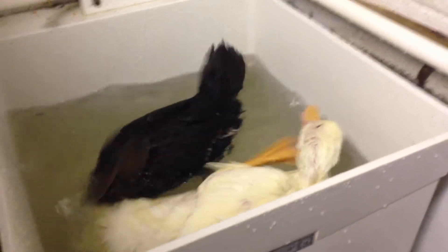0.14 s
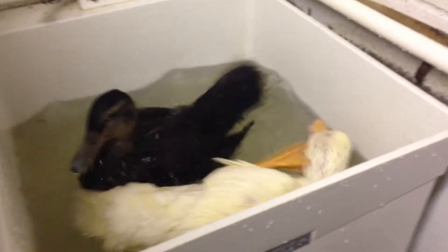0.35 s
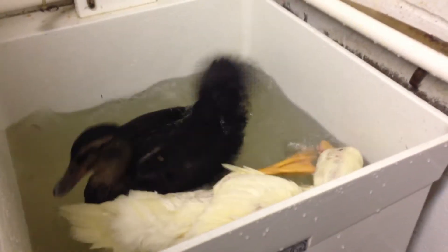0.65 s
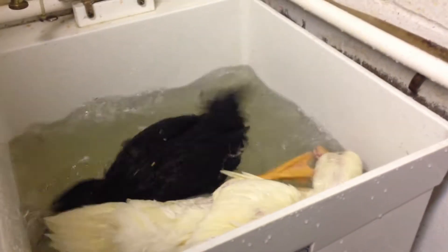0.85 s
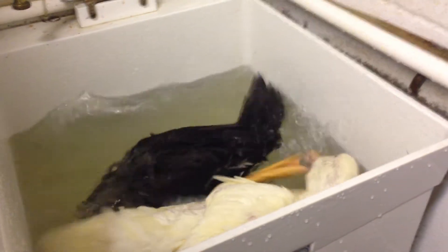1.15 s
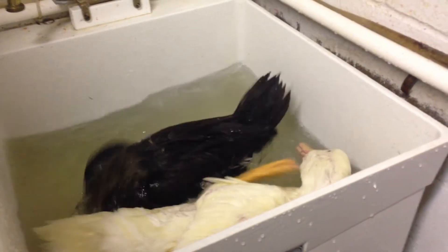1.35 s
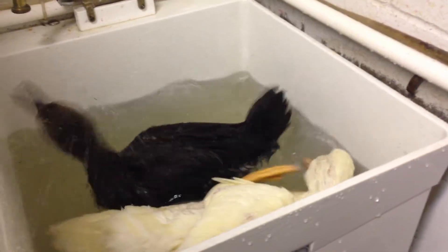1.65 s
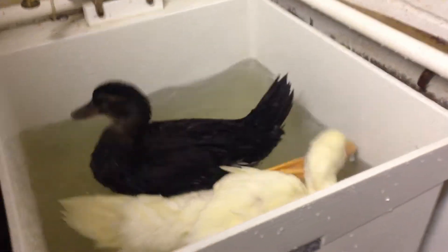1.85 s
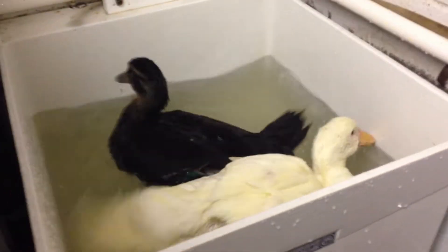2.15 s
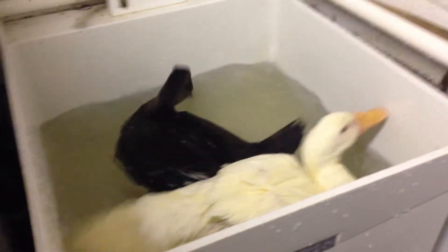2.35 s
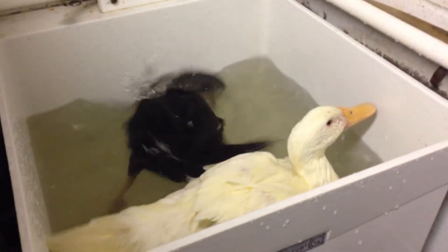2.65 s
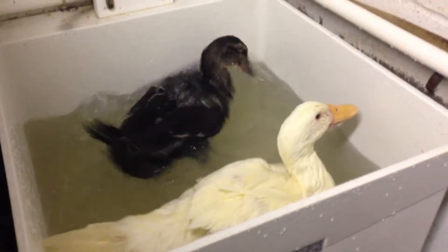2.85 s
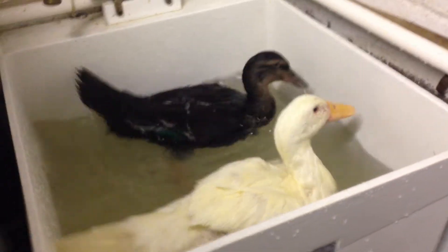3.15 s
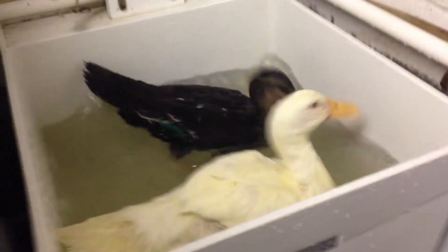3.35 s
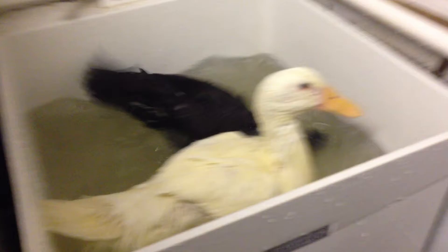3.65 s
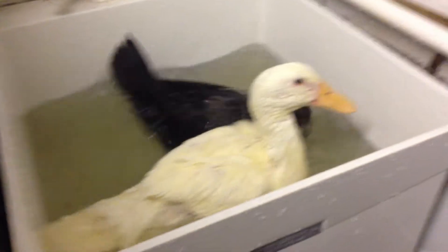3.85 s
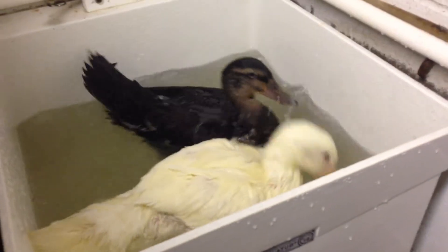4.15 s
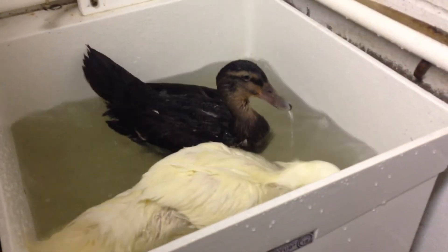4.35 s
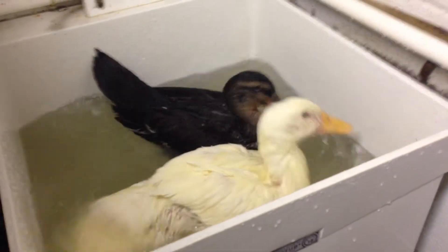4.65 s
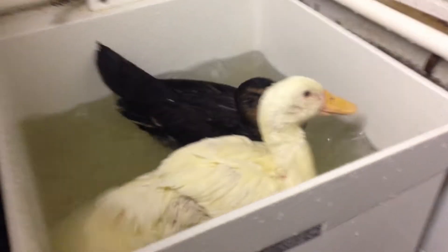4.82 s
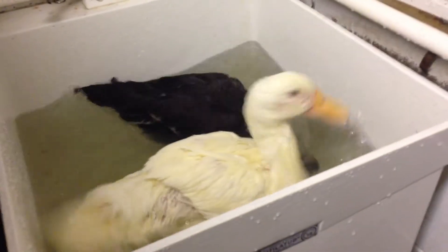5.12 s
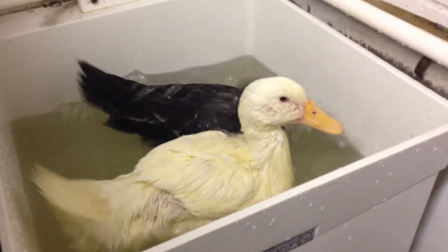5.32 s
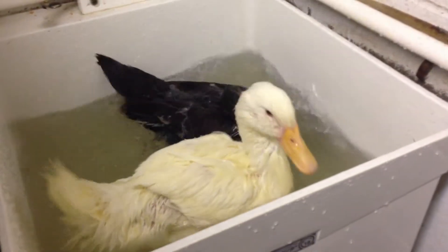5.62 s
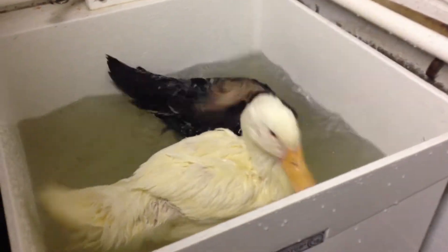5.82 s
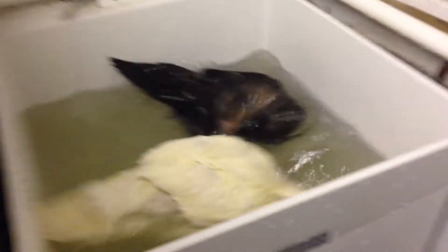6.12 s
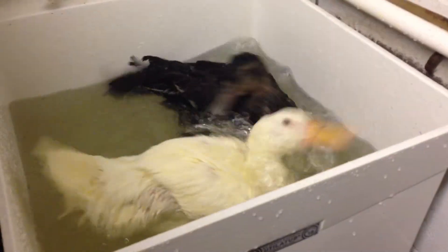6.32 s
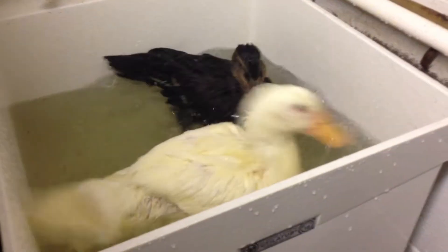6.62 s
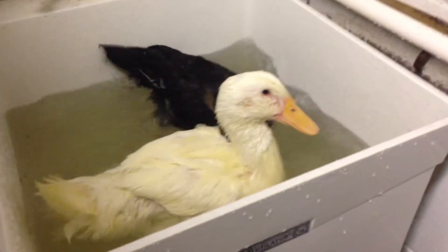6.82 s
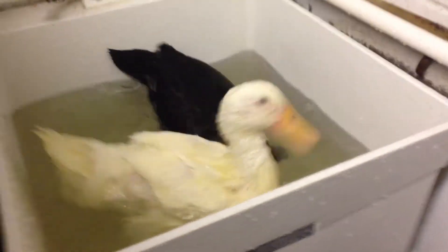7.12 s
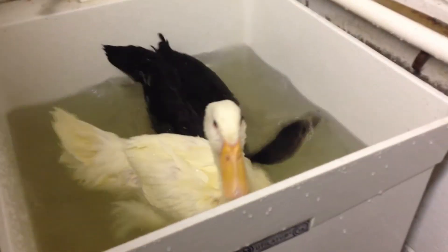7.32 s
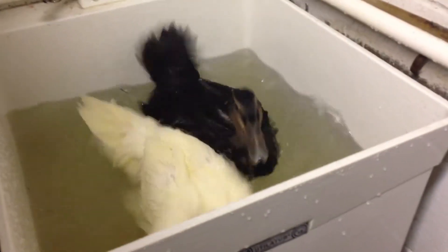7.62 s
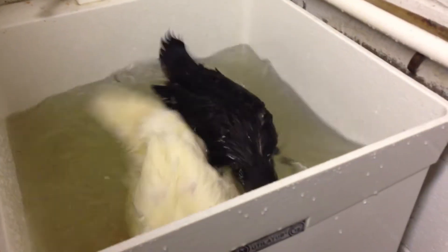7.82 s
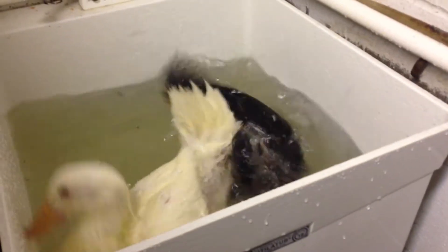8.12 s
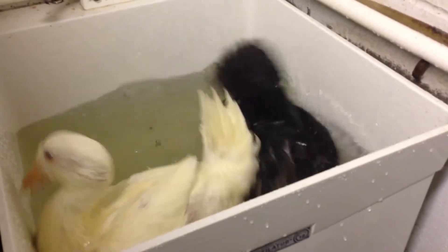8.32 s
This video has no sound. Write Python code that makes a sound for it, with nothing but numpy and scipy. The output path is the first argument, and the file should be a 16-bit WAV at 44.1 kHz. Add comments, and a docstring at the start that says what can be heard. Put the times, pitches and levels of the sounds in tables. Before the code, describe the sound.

Two young ducks bathe in a half-filled plastic utility sink in a small hard room, heard close. Busy splashing, bubbling and clear plinks fill the opening, with a hollow thump as water slaps the tub. It settles to lighter drips and gurgles with occasional knocks, nearly quiets with one tiny squeak, then bursts into strong churning at the end. Faint low room rumble underneath.

```python
"""In a small, hard room two young ducks bathe in a half-filled plastic utility sink.
Dipping heads and wagging tails churn the water: swarms of pulsing bubbles, foam and droplets of shaped noise.
Single bubbles plink, air pockets gulp and the tub booms low, as decaying sines; splashes hiss as brief noise.
Hard strokes slap the water with dying noise and make the tub ring in its modes.
A faint squeak wavers once; wall echoes, a room tail and a faint rumble surround it all."""
import sys
import numpy as np
from scipy import signal
from scipy.fft import rfft, irfft, next_fast_len
from scipy.io import wavfile
from scipy.ndimage import uniform_filter1d

SR = 44100
rng = np.random.default_rng(int(sys.argv[2]) if len(sys.argv) > 2 else 0)


def master(y):
    """Save y as 16-bit WAV."""
    cut = np.clip(np.atleast_2d(y).T, -1, 1)
    pcm = np.round(cut * 32767)  # scale
    wavfile.write(sys.argv[1], SR, pcm.astype(np.int16))


N = 373527


def amp(db):
    """Logarithmic level: decibels to amplitude gain."""
    return 10 ** (np.asarray(db) / 20)


def unit(x):
    """Power normalization: scale to rms 1."""
    return x / np.sqrt(np.mean(x ** 2) + 1e-20)


def along(points, hz):
    """Logarithmic frequency scale: interpolate (frequency [Hz], value) points along it."""
    f, v = np.transpose(points)
    return np.interp(np.log(hz + 1), np.log(f + 1), v)


def filtered(x, gain):
    """Linear filtering: multiply the spectrum of x by a gain that depends on frequency."""
    size = next_fast_len(len(x) + 2048)
    spectrum = rfft(x, size) * gain(np.fft.rfftfreq(size, 1 / SR))
    return irfft(spectrum, size)[:len(x)]


def add(track, s, sound):
    """Superposition: mix a sound into the track at time s [s]."""
    part = track[max(0, round(s * SR)):][:len(sound)]
    part += sound[:len(part)]


def dying_noise(decay):
    """Frequency-dependent damping: half a second of noise, each frequency with its own t60."""
    hz, t, z = signal.stft(rng.standard_normal(SR // 2), SR, nperseg=128)
    loss_db = 60 * t / along(decay, hz)[:, None]
    return signal.istft(z * amp(-loss_db), SR, nperseg=128)[1][:SR // 2]


def bubble(t, hz, t60, glide):
    """Volume pulsation: a bubble swells within a cycle, then dies while its pitch slides (octaves per s)."""
    pitch = hz * 2 ** np.clip(glide * t, -1, 1)
    tone = np.sin(2 * np.pi * np.cumsum(pitch, axis=-1) / SR)
    decay = np.exp(-np.log(1000) * t / t60)
    swell = 1 - np.exp(-2 * hz * t)
    return tone * decay * swell


def swarm(per_s, low_hz, high_hz, cycles, spread_db, rise):
    """Random superposition: a steady stream of bubbles, many weak and few strong, of rms 1."""
    when, kind, strength = rng.random((int(per_s * N / SR), 3)).T
    size, life = rng.random((300, 2)).T[:, :, None]
    hz = low_hz * (high_hz / low_hz) ** size
    t60 = cycles / hz * (.5 + life)
    k = np.arange(int(SR * cycles / low_hz))
    shapes = bubble(k / SR, hz, t60, rise / t60)  # rise: octaves per t60
    chosen = shapes[(kind * len(shapes)).astype(int)]
    grains = amp(spread_db * strength ** 3)[:, None] * chosen
    places = (when * N).astype(int)[:, None] + k
    return unit(np.bincount(places.ravel(), grains.ravel(), minlength=N)[:N])


def wavering(depth_db, size):
    """Random amplitude modulation: a gain of rms depth_db, smoothed over size samples."""
    drift = signal.fftconvolve(rng.standard_normal(N), np.hanning(size), "same")
    return amp(depth_db * unit(drift))


def bout(s, length):
    """Growth and damping of stirred water: it swells up to time s, holds, then settles."""
    rise_s, settle_db_per_s = 0.049, 201
    t = np.arange(N) / SR - s
    swell = np.clip(1 + t / rise_s, 0, 1) ** 2
    return swell * amp(-settle_db_per_s * np.maximum(t - length, 0))


def agitation():
    """Addition of powers: every bout stirs gurgle, bubbling and spray in water never quite calm."""
    # bouts of dipping, paddling and tail wagging: (time [s], length [s], bubbling drive [dB],
    # gurgle over bubbling drive [dB], spray over bubbling drive [dB])
    stirs = [(0.0, 0.045, -55.5, 0, -9), (0.097, 0.2, -54.5, -16, -6.5), (0.528, 0.0081, -50, -27, -0.5),
             (0.627, 0.015, -46.5, -19, -7), (0.728, 0.04, -43.5, -24, -9.5), (0.86, 0.3, -48.5, -14, -9),
             (1.17, 0.059, -43.5, -7, -13), (1.264, 0.16, -59.5, -6, 7.5), (1.59, 0.15, -57, -0.5, -1),
             (1.706, 0.12, -53, -2, -8.5), (1.89, 0.65, -60.5, -9, -6.5), (2.43, 0.16, -71.5, -17, 3),
             (2.608, 0.3, -56, -1, -6), (2.929, 0.037, -50, 1, -9), (2.98, 0.35, -59, -8, -9),
             (3.5, 0.56, -60.5, -6.5, -7), (4.227, 0.011, -55.5, 4.5, -10), (4.597, 0.11, -60.5, -6, -5),
             (4.735, .38, -63.5, -6.5, -3), (5.147, 0.17, -53, -13, -10), (5.335, 0.081, -48, -3, -27),
             (5.467, 0.1, -50.5, -9, -6.5), (5.6, 0.16, -62, -5, -2), (6.101, 0.025, -61, 3, -1.5),
             (6.285, 0.066, -54.5, -10, -7.5), (6.433, 0.054, -56, -26, 3.5),
             (6.572, 0.13, -56.5, -21, -4.5), (7.457, .02, -47.5, -7, -0.5), (7.674, 0.07, -60, -4, 1.5),
             (7.839, 0.028, -56, 1, -9), (7.947, 0.059, -42.5, -3, -14.5), (8.081, 0.088, -40, -6.5, -11.5),
             (8.208, 0.047, -43.5, -9, -5), (8.303, 0.082, -53.5, -0.5, -5)]
    calm_db = -76.5  # drive between bouts
    power = np.full((3, N), amp(calm_db) ** 2)
    for s, length, db, gurgle_db, spray_db in stirs:
        drive = amp([[db + gurgle_db], [db], [db + spray_db]])
        power += drive ** 2 * bout(s, length) ** 2
    return np.sqrt(power)


def churn():
    """Bubble size sets pitch: large ones gurgle, small ones tinkle, a few chirp; foam washes, droplets patter."""
    # spectrum of the foam wash: (frequency [Hz], relative density [dB per Hz])
    foam_colour = [(400, -29), (1300, -13), (2400, -5), (4500, -10.5), (9000, -22)]
    # weighting of the falling droplets: (frequency [Hz], relative level [dB])
    patter_colour = [(100, -60), (500, -25), (1500, -10.5), (3000, -0.5), (5000, 1), (8000, 0.5),
                     (12000, -5), (16000, -20)]
    gurgle_db, bubbling_db, spray_db = 20 * np.log10(agitation())
    gurgle = swarm(per_s=300, low_hz=500, high_hz=1600, cycles=18, spread_db=12, rise=.4)
    bubbling = swarm(per_s=330, low_hz=1300, high_hz=4600, cycles=36, spread_db=19, rise=.3)
    fizz = swarm(per_s=380, low_hz=4200, high_hz=11000, cycles=40, spread_db=18, rise=.1)
    chirps = swarm(per_s=70, low_hz=1100, high_hz=6000, cycles=55, spread_db=14, rise=.45)
    patter = swarm(per_s=1400, low_hz=1500, high_hz=16000, cycles=3, spread_db=13, rise=0)
    # the square root tilts the droplets up by 3 dB per octave
    patter = unit(filtered(patter, lambda hz: amp(along(patter_colour, hz)) * np.sqrt(hz)))
    foam = unit(filtered(rng.standard_normal(N), lambda hz: amp(along(foam_colour, hz))))
    foam_db = 1.287 * bubbling_db + 9.0  # only hard stirring whips up much foam
    clumps = wavering(depth_db=3.0, size=900)
    bubbles = amp(gurgle_db) * gurgle
    bubbles += amp(bubbling_db - 8.5) * bubbling * clumps
    bubbles += amp(spray_db - 1.0) * fizz
    bubbles += amp(bubbling_db - 5) * chirps
    return bubbles + amp(foam_db) * foam + amp(spray_db + 0.5) * patter * clumps


def plinks():
    """Bubble resonance: single bubbles ring briefly, the stronger ones shorter; the tub wall returns each ping."""
    # the clearest single bubbles: (time [s], relative level [dB], nominal pitch [Hz])
    single_bubbles = [(0.1127, -45.5, 1255), (0.197, -45, 3320), (0.241, -34.5, 2580), (0.2436, -39, 1420),
                      (0.3, -41.5, 1766), (0.5324, -39, 1360), (0.626, -36, 2430), (0.64, -25.5, 1970),
                      (0.6535, -38, 853), (0.696, -33.5, 3440), (0.739, -31.5, 1540), (0.754, -27, 1820),
                      (0.769, -31, 2850), (0.7878, -34, 5270), (0.8434, -17.5, 2821), (0.9414, -27.5, 1930),
                      (1.0132, -36.5, 913), (0.929, -36, 6000), (1.0267, -28, 4300), (1.0601, -23.5, 2400),
                      (1.1503, -34, 1770), (1.1625, -28.5, 3540), (1.189, -40, 1330), (1.224, -29.5, 1540),
                      (1.2501, -13, 3050), (1.263, -22.5, 2670), (1.4856, -16.5, 2430), (1.496, -21, 3200),
                      (1.5333, -25, 1900), (1.7156, -43, 676), (1.786, -35, 754), (1.791, -38.5, 1116),
                      (1.8, -34, 2100), (1.832, -37.5, 1300), (1.8346, -33, 2450), (1.891, -38, 4260),
                      (1.947, -36, 3200), (2.0205, -32.5, 2850), (2.1597, -34, 2770), (2.2453, -33.5, 1990),
                      (2.5784, -34, 2260), (2.618, -14.5, 4530), (2.6198, -30, 1150), (2.751, -27.5, 7537),
                      (2.8537, -37, 4091), (2.9169, -37, 2930), (2.9132, -41, 850), (2.9388, -33, 1260),
                      (2.944, -30, 1860), (2.9866, -39.5, 3500), (2.9932, -33.5, 1470), (3.118, -33, 2324),
                      (3.326, -38.5, 7000), (3.6567, -27.5, 4820), (3.7903, -37.5, 1900),
                      (3.8097, -39, 3270), (3.937, -41, 4600), (4.026, -42, 2940), (4.0373, -33, 7970),
                      (4.051, -46, 5900), (4.081, -36, 4840), (4.241, -33.5, 6900), (4.481, -46, 1860),
                      (4.6127, -51, 1760), (4.6346, -41, 2970), (4.6785, -41, 3670), (4.772, -47, 3090),
                      (5.158, -28.5, 1740), (5.2496, -40, 802), (5.336, -45, 1430), (5.377, -41, 1863),
                      (5.30, -50.5, 1000), (5.3988, -41, 694), (5.495, -34, 2100), (5.5078, -24.5, 2498),
                      (5.5622, -44, 745), (5.575, -39, 2930), (5.635, -32, 6800), (5.743, -42.5, 4100),
                      (5.8004, -32.5, 2330), (6.176, -35, 6320), (6.2942, -41.5, 2300), (6.3806, -36, 4060),
                      (6.4449, -28, 3520), (6.4483, -26.5, 2300), (6.4966, -42.5, 1440),
                      (6.5546, -41, 5450), (6.6081, -46, 2590), (6.83, -42, 3140), (7.3979, -33, 2320),
                      (7.456, -27.5, 2810), (7.54, -33, 2300), (7.708, -32, 7000), (7.942, -35, 1378),
                      (7.9614, -22.5, 2300), (8.19, -27, 5780), (8.243, -38, 1530), (8.2607, -35, 1760),
                      (8.314, -37, 1120), (8.3222, -31.5, 1005), (8.366, -41, 1220), (8.379, -40, 2560)]
    # a bubble of the reference level rings 58 cycles; stronger ones die sooner
    ring_cycles, reference_db, halving_db = 58, -31, 27
    out, t = np.zeros(N), np.arange(SR // 10) / SR
    for s, db, hz in single_bubbles:
        t60 = ring_cycles / hz * 2 ** ((reference_db - db) / halving_db)
        rise, detour = rng.random(2)
        # starts just under the nominal pitch and slides up
        ping = amp(db + 2.5) * bubble(t, hz * .96, t60, glide=(0.35 + 0.4 * rise) / t60)
        add(out, s, ping)
        add(out, s + 0.004 + 0.0042 * detour, amp(-9.5) * ping)
    return out


def splashes():
    """Breakup of a water sheet: a brief hiss of droplets and the tiny bubbles that they drive in."""
    # splashes: (time [s], relative level [dB], mist: spectral lift from 10 kHz up [dB])
    splash_events = [(0.047, -41.5, 14), (0.115, -39.5, 12), (0.206, -34.5, -7), (0.453, -41.5, -1),
                     (0.5324, -31, -11), (0.6403, -27, -5), (0.728, -31, 21), (0.7625, -30, -25),
                     (0.8415, -27, 8), (0.926, -28, 2), (0.956, -24, 6), (0.993, -40, 28),
                     (1.0262, -26, -30), (1.056, -31.5, 3), (1.1508, -28.5, 9), (1.2488, -22.5, -18),
                     (1.3734, -25, 4.5), (1.4871, -27.5, 1), (1.56, -27.5, -37), (1.62, -37, -23),
                     (1.815, -27, 0), (1.8897, -44, -23), (1.9518, -31.5, 5), (2.013, -41.5, 11),
                     (2.094, -40.5, -16), (2.1298, -32.5, -19), (2.158, -38, 13), (2.2462, -34, -29),
                     (2.3276, -42, 5), (2.6155, -20.5, -3.5), (2.743, -31, -8), (2.7493, -29, -2),
                     (2.787, -23, -6), (2.8146, -29.5, 10), (2.898, -35.5, 21), (2.9297, -28.5, -9),
                     (3.1798, -39.5, -2), (3.2548, -41.5, 9), (3.118, -40, -12), (3.324, -52, 31),
                     (3.459, -41.5, -5), (3.527, -35, -7), (3.6563, -35, 13), (3.7887, -42.5, -4),
                     (3.9005, -40.5, -21), (4.035, -35.5, 0), (4.0799, -33, 28), (4.2344, -41.5, -5),
                     (4.275, -47, 10), (4.342, -41, -3), (4.406, -44.5, 8), (4.641, -43.5, 27),
                     (5.1567, -28, 2.5), (5.254, -35.5, -9), (5.335, -38.5, 27), (5.422, -35, -2),
                     (5.635, -39.5, 0), (5.728, -41.5, 32), (6.2853, -45, 26), (6.3764, -37, -1),
                     (6.434, -27, -1), (6.447, -33, -5), (6.5555, -44, 10), (7.393, -44, -10),
                     (7.456, -44, -9), (7.597, -37.5, 5), (7.7114, -37.5, 9), (7.7983, -37, 2),
                     (7.957, -28, -17), (7.9854, -26.5, -5), (8.0995, -26, -24), (8.3115, -28.5, -14)]
    # spectrum of the spray before the mist lift: (frequency [Hz], relative density [dB per Hz])
    spray_colour = [(100, -60), (500, -22), (1500, -8), (3000, 0.5), (5000, 0.5), (8000, -1.5), (12000, -9),
                    (16000, -22)]
    swell_s, fade_s = 0.002138, 0.0061
    drizzle_db, drizzle_fade_s = -17, .022  # a weaker, slower second decay
    out, t = np.zeros(N), np.arange(SR // 8) / SR
    for s, db, mist_db in splash_events:
        flutter = unit(uniform_filter1d(rng.standard_normal(len(t)), size=30))
        droplets = rng.standard_normal(len(t)) * amp(2.5 * flutter)

        def colour(hz):
            return amp(along(spray_colour, hz) + along([(4500, 0), (10000, mist_db)], hz))

        swell = 1 - np.exp(-(t / swell_s) ** 2)
        fade = np.exp(-t / fade_s) + amp(drizzle_db) * np.exp(-t / drizzle_fade_s)
        hiss = unit(filtered(droplets, colour)) * fade * swell
        delay, size, strength = rng.random((9, 3)).T[:, :, None]  # nine bubbles
        hz = 1700 * 7 ** size
        age = np.maximum(t[:SR // 20] - .018 * delay ** 2, 0)
        level = amp(-8 * strength - 2.7 * delay) * colour(hz)
        rings = (bubble(age, hz, 35 / hz, glide=15) * level).sum(axis=0)
        rings *= np.linalg.norm(hiss) / np.linalg.norm(rings)  # hiss and bubbles share the energy equally
        rings = np.pad(rings, (0, len(t) - len(rings)))
        add(out, s - swell_s / 2, amp(db - 6.5) * (hiss + rings))
    return out


def gulps_and_booms():
    """Low resonance: air pockets gulp with gliding pitch, and the tub's lowest mode booms twice."""
    # air pockets, and two low booms of the tub near 140 Hz:
    # (time [s], relative level [dB], starting pitch [Hz], t60 [s], glide [octaves per s])
    low_tones = [(.866, -31, 1034, 0.063, -36), (2.191, -17, 398, 0.045, -28), (2.244, -30.5, 287, .09, -4),
                 (2.378, -28, 353, 0.069, -24), (2.7863, -5, 653, 0.021, -6),
                 (2.795, -11.5, 631, 0.05, 64.5), (3.545, -9.5, 640, 0.011, -24),
                 (3.562, -29, 144, 0.64, 0), (3.607, -24, 640, .022, 1), (4.42, -28, 400, .12, -2.5),
                 (4.478, -36, 593, .08, -2), (5.324, -39.5, 452, 0.17, -5), (6.139, -34, 666, 0.055, -19),
                 (6.151, -27, 422, 0.064, -3), (7.45, -29.5, 430, 0.13, 5), (8.076, -25, 642, 0.18, 1.5),
                 (8.099, -20.5, 373, 0.082, 0), (8.109, -32.5, 136, 0.26, -1.5),
                 (8.148, -31, 678, 0.12, -0.5), (8.195, -26.5, 450, 0.04, 0)]
    out, t = np.zeros(N), np.arange(SR // 2) / SR
    for s, db, hz, t60, glide in low_tones:
        # the same decaying sine serves pockets and booms
        add(out, s, amp(db) * bubble(t, hz, t60, glide))
    return out


def strokes():
    """Impact excitation of modes: a slab of water slaps the wall and the tub's modes swell and ring."""
    # strokes that shake the tub: (time [s], relative slap level [dB], relative ring level [dB],
    # bass lift [dB], treble lift [dB])
    blows = [(0.863, -14, -40.5, -2, -8), (2.19, -21.5, -41, 0.5, -5.5), (2.376, -28.5, -54.5, 11, -16),
             (2.786, -14.5, -39, -5.5, 0), (3.542, -15, -34, -4, -12), (3.605, -21, -44, 1, -15),
             (4.405, -11.5, -31.5, -1.5, -6), (6.134, -16.5, -36.5, 1, -11), (8.073, -11, -34.5, -8, -1.5),
             (8.099, -25, -42.5, 9, 10)]
    # modes of the tub and the air in it: (frequency [Hz], mean relative level [dB], t60 [s])
    tub_modes = [(146.1, 0.5, 0.51), (224, -33, 0.37), (308, 3.5, 0.24), (356, -2.5, 0.48),
                 (390.5, -7.5, 0.29), (455.5, 3.5, 0.29), (535, 2, 0.27), (668.6, 10.5, 0.13),
                 (733, -36, 0.094), (786, 7, 0.15), (913, 1, 0.086), (993, -2, 0.17), (1055, 2.5, 0.045),
                 (1198, 5.5, 0.11), (1550, -16, 0.33)]
    # weighting of the slap noise: (frequency [Hz], relative density [dB per Hz])
    slap_colour = [(30, -52), (80, -23), (150, 1), (300, -0.5), (640, 6), (800, -2), (1100, -0.5),
                   (2200, -0.5), (4500, -9.5), (10000, -36)]
    # damping of the slap: (frequency [Hz], t60 [s])
    slap_decay = [(120, 0.56), (400, 0.24), (800, 0.11), (2000, 0.081), (6000, 0.017)]
    out, t = np.zeros(N), np.arange(SR // 2) / SR
    for s, slap_db, ring_db, bass_db, treble_db in blows:
        def weight(hz):
            return amp(along([(150, bass_db), (300, 0), (480, 0), (1400, treble_db)], hz))

        ring = np.zeros(len(t))
        for hz, level, t60 in tub_modes:
            strength = amp(level + rng.normal(0, 2.2)) * weight(hz)
            envelope = np.exp(-np.log(1000) * t / t60) * (1 - np.exp(-hz * t / 4))
            ring += strength * envelope * np.sin(2 * np.pi * hz * t)
        slap = filtered(dying_noise(slap_decay), lambda hz: amp(along(slap_colour, hz)) * weight(hz))
        slap = slap * (1 - np.exp(-t / 0.0027))
        add(out, s, amp(ring_db) * ring + amp(slap_db) * slap)
    return out


def squeak():
    """Frequency modulation: a thin wavering tone in the lull between dips."""
    # course of the faint squeak: (time [s], pitch [Hz], level [dB])
    squeak_course = [(6.885, 1730, -84), (6.91, 1760, -55), (6.935, 1684, -75), (6.96, 1624, -52),
                     (6.99, 1780, -66), (7.03, 1690, -80)]
    s, *columns = np.transpose(squeak_course)
    t = np.arange(N) / SR
    hz, db = [np.interp(t, s, column) for column in columns]
    tone = np.sin(2 * np.pi * np.cumsum(hz) / SR)
    return amp(db) * tone * (t > s[0]) * (t < s[-1])


def surroundings(x, walls_db, room_db):
    """Reflection and reverberation: the echo pattern is drawn afresh every 0.2 s and crossfaded."""
    # reverberation of the room: (frequency [Hz], t60 [s])
    room_decay = [(150, 0.31), (1000, 0.33), (4000, 0.39), (14000, 0.32)]
    out, hop = np.zeros(N), SR // 5
    window = signal.get_window("hann", 2 * hop)
    padded = np.pad(x, (0, 2 * hop))
    for start in range(0, N, hop):
        walls = np.zeros(SR // 2)
        delays = (SR * rng.uniform(.002, .016, size=8)).astype(int)
        walls[delays] = rng.choice([-1, 1], size=8) / np.sqrt(8)
        tail = dying_noise(room_decay) * (1 - np.exp(-np.arange(SR // 2) / SR / 0.011))
        echo = amp(walls_db) * walls + amp(room_db) * tail / np.linalg.norm(tail)
        piece = padded[start:start + 2 * hop] * window
        add(out, start / SR, signal.fftconvolve(piece, echo))
    return out


def room_tone():
    """Stationary coloured noise: steady rumble and hiss, with a low room resonance."""
    # room tone before the resonance: (frequency [Hz], relative density [dB per Hz])
    air_colour = [(25, -31), (50, -23), (100, -12), (130, -1), (165, 1), (250, -5), (320, -5.5),
                  (420, -12.5), (650, -14.5), (850, -27), (1400, -26.5), (2100, -25), (4000, -31),
                  (8000, -33), (15000, -34)]

    def colour(hz):
        resonance_db = 3 / (1 + ((hz - 152) / 22) ** 2)
        return amp(along(air_colour, hz) + resonance_db)

    return amp(-52.5) * unit(filtered(rng.standard_normal(N), colour))


def scene():
    """Superposition of bright water sounds and low tub sounds, their echoes and the room tone."""
    bright = churn() + plinks() + splashes() + squeak()
    low = gulps_and_booms() + strokes()
    echoes = surroundings(bright + amp(-3.5) * low, walls_db=-5.5, room_db=-21.0)
    return (bright + low + echoes + room_tone())[None]


def record(dry):
    """Band limitation: nothing at or above the top frequency passes."""
    top_hz = 15550
    return filtered(dry[0], lambda hz: hz < top_hz)[None]


dry = scene()
out = record(dry)
master(out)
```